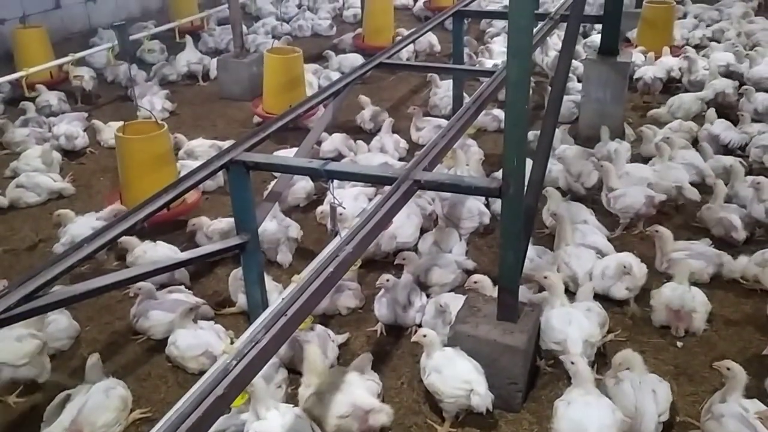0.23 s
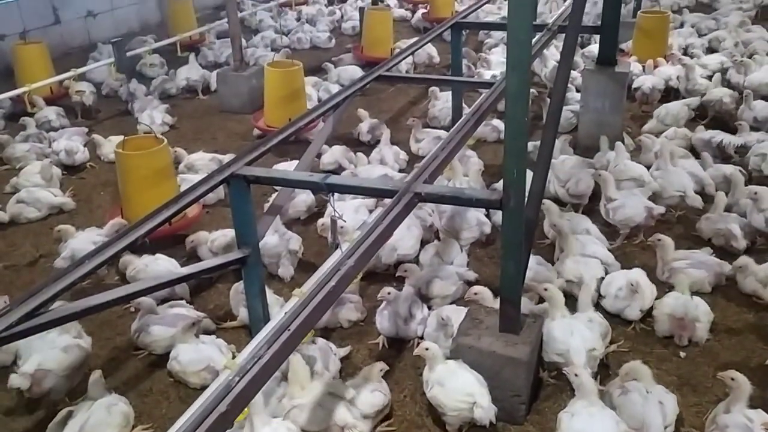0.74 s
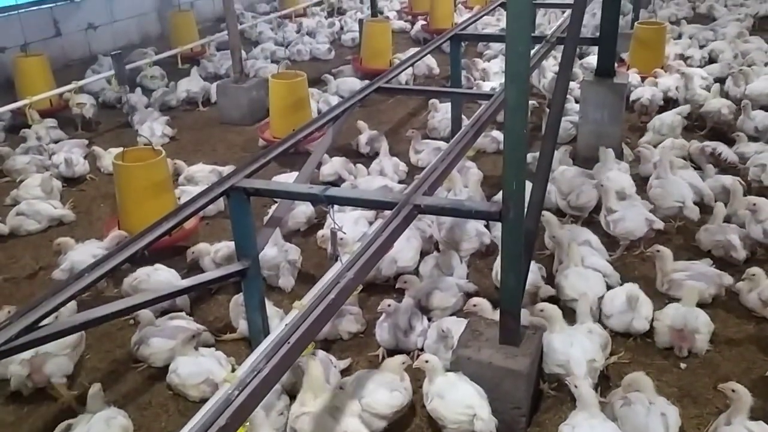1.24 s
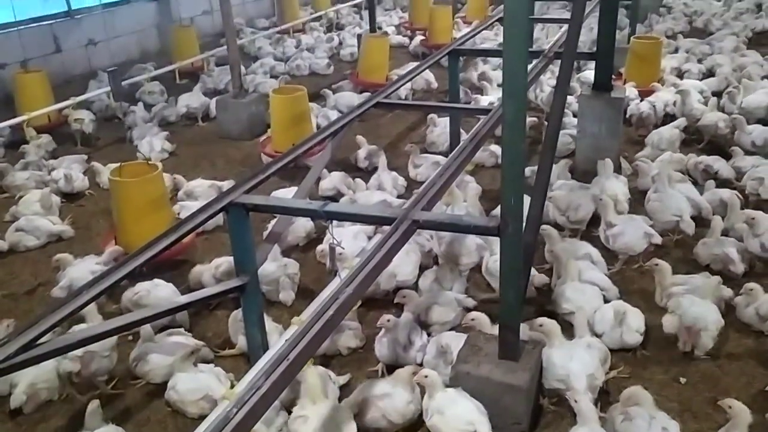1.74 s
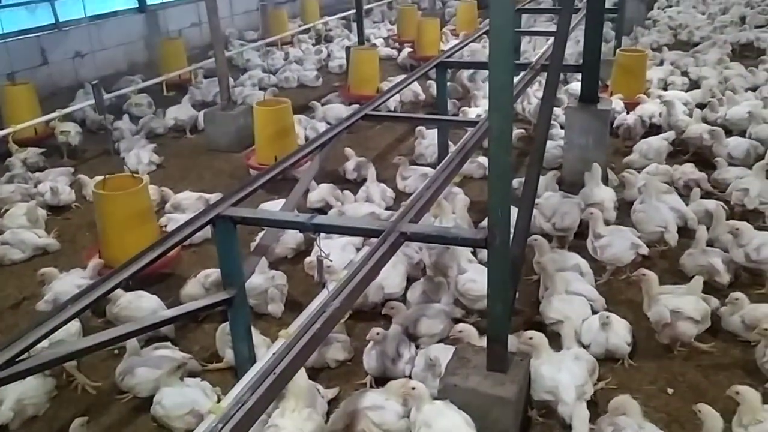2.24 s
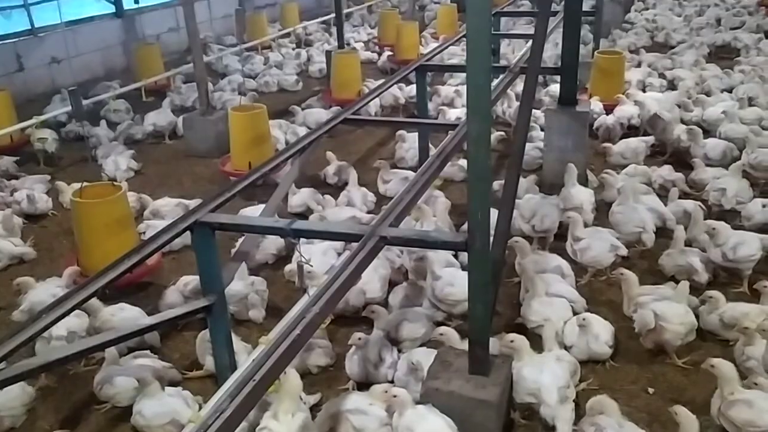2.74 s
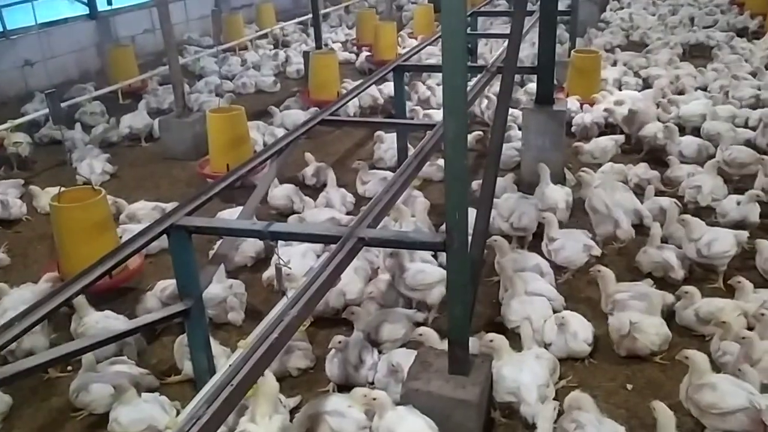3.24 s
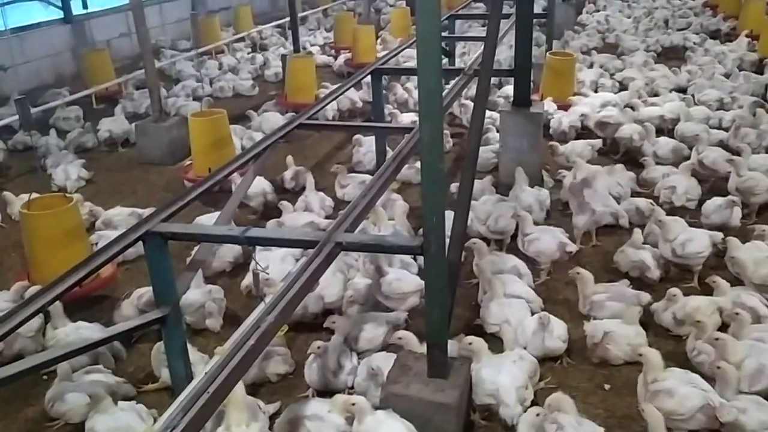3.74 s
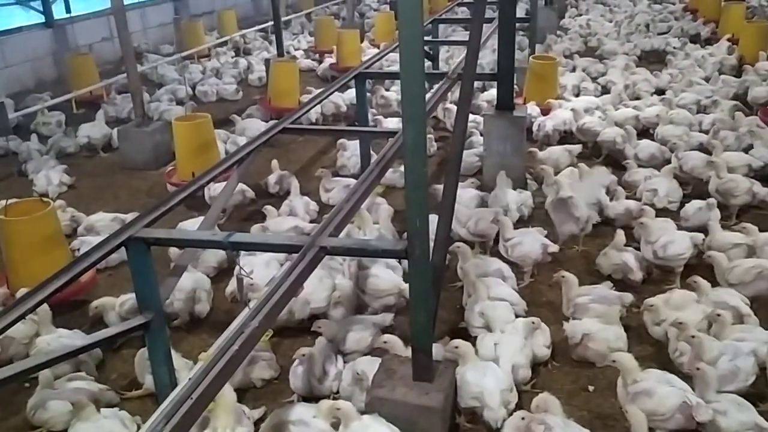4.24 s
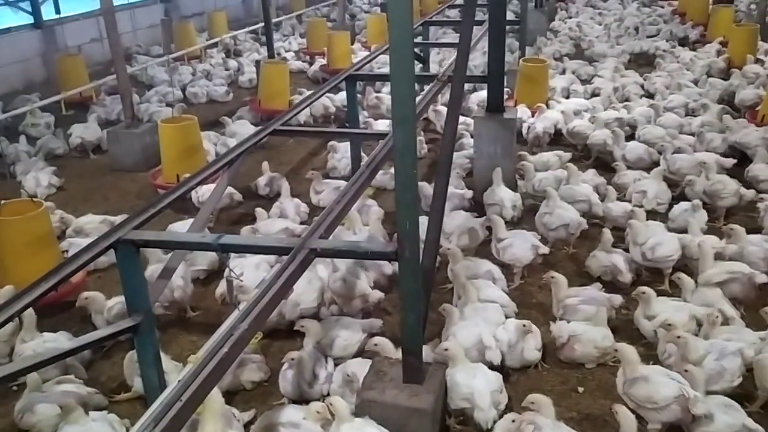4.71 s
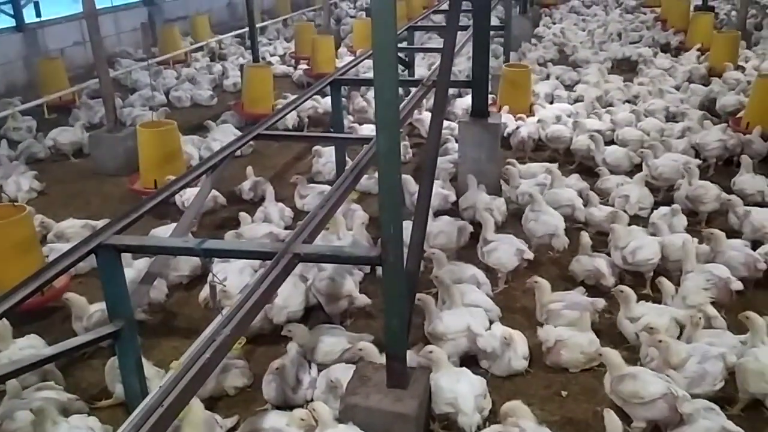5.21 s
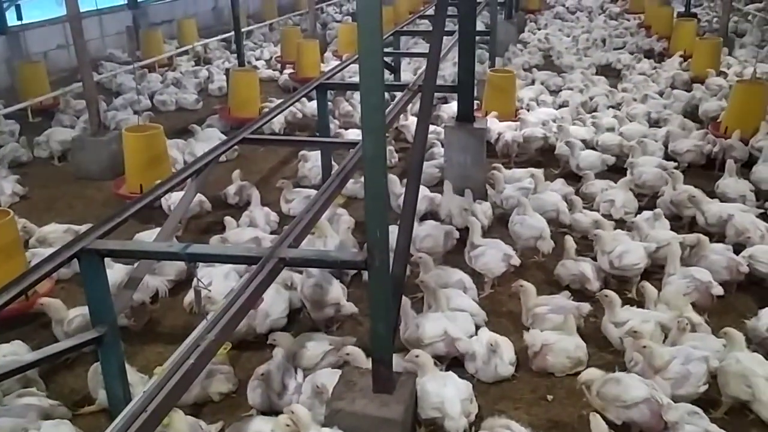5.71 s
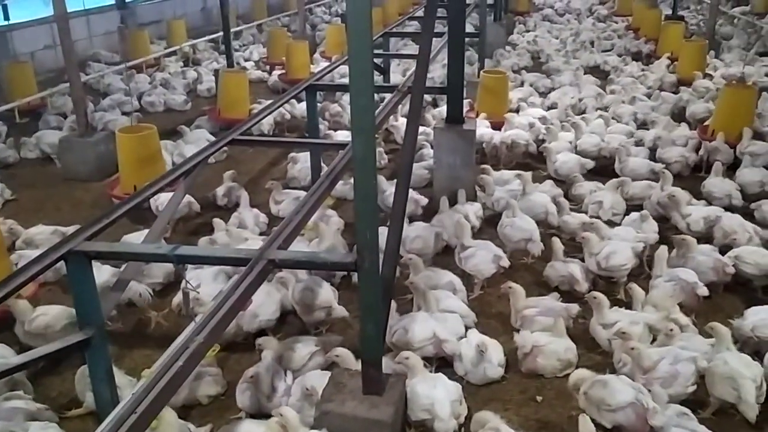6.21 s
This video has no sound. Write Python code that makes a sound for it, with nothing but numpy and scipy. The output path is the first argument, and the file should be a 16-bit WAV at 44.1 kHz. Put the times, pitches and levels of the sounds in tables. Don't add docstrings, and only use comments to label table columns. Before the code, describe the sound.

For about six and a half seconds, a closed barn full of young chickens sounds busy and even. A deep fan drone near 86 Hz swells and beats irregularly, with soft moving air beneath a blurred wash of distant chirps. From 0 s, nearby birds scatter very short falling peeps, clear little whistles and hoarse rasps, most of the rasps before 1.6 s. Faint pulsed clucks come around 0.2, 1.6, 2.4 and 4.1 s. Dry litter rustles constantly; bright claw scratches cluster around 1.2 s and recur, with dull beak knocks near 2.2, 2.6 and 4.1 s. Soft low foot thumps stand out around 0.8 and 5 s. The crowd dips briefly near 2.5 s. At 5.7 s one bird gives a thin, high squeal, about an eighth of a second long, then peeping continues to the end. The phone's stereo sound is close, with patchy treble.

```python
import sys
import numpy as np
from scipy import signal
from scipy.fft import rfft, irfft
from scipy.io import wavfile
from scipy.ndimage import uniform_filter1d

SR = 44100
rng = np.random.default_rng(int(sys.argv[2]) if len(sys.argv) > 2 else 0)


def waveform_to_disk(signal):
    frames = np.transpose(np.atleast_2d(signal))
    scaled = np.clip(frames, -1, 1) * 32767
    samples = np.round(scaled).astype(np.int16)
    wavfile.write(sys.argv[1], SR, samples)


def elevation(decibels):
    levels = np.asarray(decibels, float)
    return 10 ** (levels / 20)


N = 284886

PORT_LAG_S = 0.00033
BURST = 6000


def unit(x):
    return x / np.sqrt(np.mean(x ** 2))


def colour(x, points):
    hz, db = np.transpose(points)
    bins = np.arange(x.shape[-1] // 2 + 1) * SR / x.shape[-1] + 1
    return irfft(rfft(x) * elevation(np.interp(np.log(bins), np.log(hz), db)), x.shape[-1])


def walk(rate, size=N):
    k = max(int(SR / rate), 2)
    smooth = uniform_filter1d(rng.standard_normal(size), k, mode="wrap")
    return unit(uniform_filter1d(smooth, k, mode="wrap"))


def curves(table):
    s, *columns = np.transpose(table)
    return [np.interp(np.arange(N) / SR, s, c) for c in columns]


def swells(table, rest_db):
    t = np.arange(N) / SR
    power = elevation(2 * rest_db)
    for s, length, db in table:
        power = power + elevation(2 * db) * np.exp(-(4 * (t - s) / length) ** 2)
    return 10 * np.log10(power)


def add(out, sound, s, pan_db, lag_s):
    for ear, start, db in ((0, s, pan_db / 2), (1, s + lag_s, -pan_db / 2)):
        i = max(int(start * SR), 0)
        out[ear, i:i + len(sound)] += elevation(db) * sound[:max(N - i, 0)]


def echo(x, t60):
    t = np.arange(int(SR * 0.8)) / SR
    tail = rng.standard_normal((2, len(t))) * np.exp(-np.log(1000) * t / t60) * (t > 0.008)
    return signal.fftconvolve(x, tail / np.sqrt(np.sum(tail ** 2) / 2), axes=1)[:, :N]


def burst(db, t60, noise, rise_s, tick_db=-30):
    t = np.arange(BURST) / SR
    decay = np.exp(-np.log(1000) * t / t60) + elevation(tick_db) * np.exp(-t / 0.006)
    return elevation(db) * noise * (1 - np.exp(-t / rise_s)) * decay


def fans():
    # t/s, length/s, level/dB
    beats = [(.14, 0.65, -37.5), (.56, 0.098, -37), (.9, 0.67, -34.5), (1.36, 0.24, -35.5),
             (1.56, 0.14, -32), (1.97, 0.22, -31.5), (2.31, 0.23, -34), (2.88, 0.41, -33),
             (3.1, 0.069, -40), (3.3, 0.3, -35), (3.83, 0.48, -41), (4.37, 0.077, -35.5),
             (4.72, 0.48, -35.5), (4.92, .1, -56), (5.17, 0.42, -33.5), (5.45, 0.9, -37.5),
             (5.78, 0.39, -34), (6.44, 0.46, -40)]
    shaft_sags = (.2, 1.65, 4.15, 5.5)
    # f/Hz, level/dB
    upper_tones = [(112, 2), (130, -3.5)]
    # f/Hz, level per Hz/dB
    air_spectrum = [(34, -21.5), (64, -0.5), (100, -3.5), (145, -12), (250, -21.5), (340, -23), (520, -33),
                    (1500, -39), (2000, -35)]
    blade_hz, shaft_hz = 86.15, 42.5
    sag_length_s, sag_db = 0.38, -22
    t = np.arange(N) / SR
    ports = np.array([[1], [-1]])

    turn = 2 * np.pi * np.cumsum(1 + 0.0078 * walk(4.63)) / SR
    shift = 0.3 * walk(6) * ports
    blade = elevation(swells(beats, -46)) * np.sin(blade_hz * turn + shift)

    sag = sum(np.exp(-((t - s) / sag_length_s * 2) ** 2) for s in shaft_sags)
    shaft_db = -46 + 0.85 * walk(2.1) + sag_db * sag
    shaft = elevation(shaft_db) * np.sin(shaft_hz * turn + 4 * shift)

    second = np.zeros((2, N))
    for hz, db in upper_tones:
        phase = hz * turn + 0.53 * walk(7.5) + 0.49 * shift
        second += elevation(db + 2.36 * walk(6.5)) * np.sin(phase)

    mid, side = colour(rng.standard_normal((2, N)), air_spectrum + [(4000, -94)])
    side = colour(side, [(40, -29), (80, -16), (150, -19.5), (300, -13.5), (500, -8), (900, 0.5)])
    air = elevation(-39.5 + 1.27 * walk(2.6)) * (mid + side * ports) / np.std(mid)
    mix = np.sqrt(2) * (blade + shaft) + elevation(-45) * unit(second) + air
    return mix * elevation(-0.4 * ports)


def syrinx_flutter():
    return (walk(1400) + 1j * walk(1400)) / np.sqrt(2)


def note(length, start_hz, end_hz, hoarse_hz, flutter, lean=0.73):
    clear_hz, second_db = 60, -27
    u = np.linspace(0, 1, int(length * SR))
    phase = 2 * np.pi * np.cumsum(start_hz + (end_hz - start_hz) * (1.1 * u ** 0.7 - 0.12)) / SR
    rough = hoarse_hz ** 2 / (hoarse_hz ** 2 + clear_hz ** 2)
    shake = flutter[(np.arange(len(u)) * hoarse_hz / 400).astype(int)]
    swing = np.sqrt(1 - rough) + np.sqrt(rough) * shake
    swing = swing / np.sqrt(np.mean(np.abs(swing) ** 2))
    tone = np.imag(swing * np.exp(1j * phase)) + elevation(second_db) * np.sin(2 * phase)
    return np.sqrt(2) * np.sin(np.pi * u ** lean) * tone


def far_crowd():
    # f/Hz, level/dB
    crowd = [(700, -11.5), (1200, -15.5), (1600, -10), (2000, -3.5), (2600, -5), (3200, -10.5),
             (4000, -10.5), (5000, -30)]
    flutter = syrinx_flutter()
    far = np.zeros((2, N))
    for when, a, b, c, d, e in rng.random((1700, 6)):
        octaves = (1.7 if a + d < 1 else 0.8) * (a + d - 1)
        hz = 2400 * 2 ** octaves
        end_hz = hz * (0.97 - 0.3 * c)
        sound = note(0.015 + 0.03 * b, hz, end_hz, 18 + 70 * b * d, flutter[int(a * N / 2):])
        db = min(-3 * np.log(e), 2.2)
        add(far, elevation(db) * sound, when * N / SR - 0.02, 8 * (c - 0.45), PORT_LAG_S * 1.6 * b)
    far = unit(far) + elevation(-7) * unit(echo(far, 0.42))
    far = colour(far, np.multiply(crowd, (1, 0.4)))
    wash = rng.standard_normal((2, N)) * elevation(3.2 * walk(11))
    return unit(unit(far) + elevation(-5.5) * unit(colour(wash, crowd)))


def litter_bed(rustle_db):
    # f/Hz, level per Hz/dB
    rustle = [(1760, -7), (3000, 5.5), (3650, -0.5), (4290, -2), (7720, -3), (11500, -6.5), (15760, -10),
              (16000, -64)]
    left_db = 3.5
    grain_db = np.minimum(4.4 * rng.exponential(size=(2, N)), 13)
    grains = (rng.random((2, N)) < 500 / SR) * elevation(grain_db)
    grains = signal.lfilter([1], [1, -0.99], grains) * rng.standard_normal((2, N))
    bed = elevation(-1.5) * unit(grains)
    shuffle = 1.68 * walk(40)
    for hz in (5000, 9000, 14000):
        part = colour(rng.standard_normal((2, N)), [(hz / 6.3, -30), (hz, 0), (hz * 130, -30)])
        flicker_db = shuffle + np.array([2 * walk(18), 2 * walk(2.4)])
        bed = bed + unit(part) * np.sqrt(hz / 14000) * elevation(flicker_db)
    pan = np.array([[left_db], [-left_db]]) / 2
    return unit(colour(bed, [(1500, -35)] + rustle)) * elevation(rustle_db + pan + 1)


def thumps():
    # t/s, peak level/dB, f/Hz
    blows = [(.02, -42, 341), (0.189, -42, 388), (0.442, -40, 217), (0.662, -38.5, 332),
             (0.836, -32.5, 216), (1.54, -48, 403), (2.311, -40, 207), (2.656, -39.5, 321),
             (2.713, -41, 372), (4.101, -40, 290.6), (4.312, -45, 308), (4.402, -42, 270),
             (5.05, -44.5, 394), (5.151, -35.5, 205), (4.969, -36, 171), (4.791, -50, 283),
             (4.909, -47, 292), (4.872, -41, 201), (5.309, -46, 330), (6.131, -45, 364)]
    out, t = np.zeros((2, N)), np.arange(BURST) / SR
    for s, db, hz in blows:
        ring = np.sin(2 * np.pi * hz * t) + 0.5 * np.sin(2 * np.pi * 1.37 * hz * t)
        add(out, burst(db, 0.11, ring, 0.0025), s, 0, 0)
    return out


def knocks():
    # t/s, peak level/dB, centre f/Hz, t60/s
    pecks = [(0.185, -36, 1790, 0.085), (0.559, -36.5, 1790, 0.082), (2.183, -31, 3300, 0.082),
             (2.422, -34, 1690, .03), (2.4265, -44, 1780, .04), (2.648, -32.5, 1470, 0.035),
             (4.782, -38, 1900, 0.022), (4.088, -33.5, 2070, 0.086), (4.415, -37, 2350, 0.073),
             (4.46, -34, 1560, 0.028), (4.949, -36.5, 2000, 0.026), (5.054, -37.5, 1120, 0.038),
             (5.53, -39.5, 2020, 0.086), (6.127, -36, 690, 0.037), (.875, -40, 1000, .04),
             (1.57, -40, 1100, .04), (3.027, -45, 1000, .04), (4.225, -44, 1100, .04)]
    out = np.zeros((2, N))
    for s, db, hz, t60 in pecks:
        body = [(hz / 7, -30), (hz / 1.94, -5), (hz, 0), (2 * hz, -5), (4 * hz, -24)]
        noise = unit(colour(rng.standard_normal(BURST), body))
        add(out, burst(db - 7.5, min(t60, 0.075), noise, 0.0007, 3), s, 1.5, 0.4 * PORT_LAG_S)
    return out + elevation(-14) * echo(out, 0.2)


def scratches():
    # t/s, peak level/dB, left minus right level/dB
    claws = [(0.175, -37, -6), (0.2135, -30.5, 6), (0.3782, -31.5, -2), (0.563, -26.5, -7),
             (1.021, -35.5, 8), (1.112, -35.5, -2), (1.2356, -32, 2), (1.247, -30, 0), (1.269, -25, 3),
             (1.345, -33.5, -2), (1.467, -41, 2.5), (1.539, -35, 0), (1.62, -34, 6), (1.6853, -39.5, 7),
             (1.841, -33, 1), (1.945, -31.5, 4), (2.1809, -47, -3), (2.285, -33.5, 4), (2.5676, -40, 1),
             (2.579, -38, 1), (2.74, -37.5, 4), (2.931, -38, 9), (2.9482, -39, 5), (3.157, -39.5, 11),
             (3.332, -31, 1), (3.7646, -33.5, 3), (4.126, -35, 4), (4.157, -32.5, 3), (4.1868, -31, 0),
             (4.471, -28, 2), (4.773, -39, -4), (4.865, -36, 2), (4.879, -30.5, 3), (5.8016, -29, -1),
             (5.9975, -36, -3), (.5202, -42, -6), (0.876, -40, -6), (1.4346, -46, 3), (1.729, -38, 0),
             (2.433, -39, 3), (2.769, -36, 3), (2.8564, -40.5, 0), (3.276, -42, 0), (3.4385, -40.5, 10),
             (3.472, -45, 5), (3.493, -43, 4), (3.7908, -31, 2), (3.8487, -56, 0), (4.2727, -45, -1),
             (4.6892, -58, -2), (4.7371, -47, -7), (5.07, -37, 5), (5.1786, -45, 0), (5.468, -40, 4),
             (5.5174, -45, -8), (5.737, -45, -3), (6.3668, -47, -3), (6.4288, -47, -3)]
    out = np.zeros((2, N))
    for s, db, pan_db in claws:
        noise = rng.standard_normal((2, BURST))
        hz = 7500 * 2 ** (0.36 * noise[0, 0])
        t60 = 0.1 * 2 ** (0.3 * noise[1, 0])
        crackle = unit(colour(noise, [(2500, -25), (hz * 0.76, -3), (hz, 0), (16000, -7)]))
        port_db = db - 10 + np.array([[pan_db], [-pan_db]]) / 2
        i = int(s * SR)
        out[:, i:i + BURST] += burst(port_db, t60, crackle, 0.0018, -1)[:, :N - i]
    return out


def clucks():
    # t/s, length/s, pulse rate f/Hz, throat f/Hz, level/dB
    pulsed = [
        (.185, 0.047, 300, 1920, -44),
        (1.555, 0.039, 300, 1900, -45),
        (2.41, 0.029, 320, 1700, -40.5),
        (4.1, 0.021, 480, 1670, -44),
    ]
    out = np.zeros((2, N))
    for s, length, rate_hz, hz, db in pulsed:
        jitter, shimmer = rng.standard_normal((2, 30))
        times = (np.cumsum(1 + 0.067 * jitter) / rate_hz * SR).astype(int)
        pulses = np.zeros(8192)
        arch = np.sin(np.pi * np.minimum(times / SR / length, 1)) ** 0.6
        pulses[times] = elevation(1.5 * shimmer) * arch
        throat = [(hz / 2.8, -30), (hz / 1.8, -6), (hz / 1.4, -9), (hz, 0), (hz * 1.4, -6), (hz * 1.9, -26)]
        sound = colour(pulses, throat)
        add(out, elevation(db) * sound / np.std(sound[:int(length * SR)]), s, 0.6, 0.3 * PORT_LAG_S)
    return out + elevation(-8) * echo(out, 0.12)


def call(out, flutter, s, length, start_hz, end_hz, db, hoarse_hz, lagged=True):
    a, b, c = rng.random(3)
    pad = 0.006
    sound = note(length + 2 * pad, start_hz, end_hz, hoarse_hz, flutter[int(a * N / 2):])
    add(out, elevation(db) * sound, s - pad, 1.4 + 4 * (b - 0.5), PORT_LAG_S * (0.05 + 0.8 * c) * lagged)


def squeal(out, flutter):
    # t/s, length/s, start f/Hz, end f/Hz
    s, length, start_hz, end_hz = (5.712, 0.125, 1935, 1915)
    overtones = [(2, -44.5), (3, -61), (4, -48), (5, -66)]
    for k, db in overtones:
        tone = note(length, k * start_hz, k * end_hz, 24 * k, flutter[1000 * int(k):], lean=0.52)
        add(out, elevation(db) * tone, s, 1.5, PORT_LAG_S)


def rasps(out, flutter):
    # t/s, length/s, start f/Hz, end f/Hz, level/dB
    hoarse = [(0.177, 0.02, 1820, 1870, -44), (0.187, 0.042, 4400, 3615, -47.5),
              (0.735, 0.06, 2960, 2770, -47), (0.876, 0.014, 833, 1000, -57),
              (0.9, 0.051, 2190, 2120, -42.5), (1.19, 0.032, 2430, 2260, -49),
              (1.228, 0.07, 2150, 2020, -46), (1.534, 0.0344, 2760, 3080, -47),
              (1.548, 0.048, 1330, 1276, -53), (4.22, 0.025, 1155, 1154, -50),
              (4.449, 0.017, 2240, 1870, -45)]
    for s, length, start_hz, end_hz, db in hoarse:
        call(out, flutter, s, length, start_hz, end_hz, db, 125)


def whistles(out, flutter):
    # t/s, length/s, start f/Hz, end f/Hz, level/dB
    clear = [(0.207, .05, 2450, 2230, -51), (0.778, 0.028, 1980, 1780, -42.5),
             (0.952, 0.038, 1900, 1650, -46), (1.22, .02, 1790, 1760, -43.5), (2.1, 0.04, 1800, 2800, -49),
             (2.382, 0.027, 1900, 1810, -48), (3.071, 0.022, 1750, 1330, -49.5),
             (3.426, 0.043, 1910, 1740, -48), (3.643, .045, 1000, 890, -54),
             (3.926, 0.029, 1930, 1874, -52), (4.612, 0.022, 1140, 1090, -50.5),
             (4.785, 0.021, 1410, 1120, -42), (6.2, 0.05, 2150, 2030, -51.5),
             (4.9, 0.039, 1710, 1610, -52.5), (5.73, .04, 7850, 7820, -48), (5.758, 0.037, 1964, 1920, -47),
             (5.903, 0.039, 2125, 1930, -47), (7, .025, 1400, 2400, -53), (6.221, 0.011, 2220, 1900, -47),
             (6.4, .018, 3420, 3265, -57.5)]
    for s, length, start_hz, end_hz, db in clear:
        call(out, flutter, s, length, start_hz, end_hz, db, 22, lagged=False)


def peeps(out, flutter):
    # t/s, length/s, start f/Hz, level/dB
    steep = [(0.628, 0.026, 1780, -48), (1.327, 0.019, 2180, -42.5), (2.288, 0.054, 2690, -47.5),
             (3.329, 0.034, 2125, -44), (3.622, 0.03, 2070, -51), (3.644, 0.046, 2110, -42),
             (3.83, 0.023, 2660, -50), (4.225, 0.027, 2510, -42), (5.355, 0.075, 1690, -53),
             (5.585, 0.019, 2136, -49.5), (5.7, 0.053, 2910, -47)]
    soft = [(0.04, 0.02, 2350, -48), (0.913, 0.015, 1546, -49.5), (1.202, 0.018, 2230, -37),
            (1.701, 0.037, 2370, -48), (2.307, 0.021, 1820, -53), (2.456, 0.037, 1990, -44),
            (2.862, 0.04, 1960, -46.5), (3.131, 0.016, 1525, -49), (3.211, 0.058, 1230, -54),
            (3.901, 0.035, 1000, -52), (3.94, 0.019, 2785, -41), (4.833, 0.011, 1370, -53),
            (5.042, 0.038, 2190, -46.5), (5.098, 0.039, 1950, -43.5), (5.161, 0.033, 2840, -54),
            (5.884, 0.023, 1010, -50), (5.991, 0.017, 2930, -49), (5.994, 0.031, 1850, -50),
            (6.282, 0.019, 2310, -45.5), (6.418, 0.026, 2135, -42)]
    even = [(0.028, 0.017, 1780, -40.5), (0.597, 0.044, 2350, -46), (0.753, 0.03, 1614, -49.5),
            (0.788, 0.021, 1370, -52), (1.25, 0.023, 1820, -40), (1.471, 0.039, 1720, -48.5),
            (2.104, 0.016, 3000, -49), (2.847, 0.0056, 1330, -56), (3.313, 0.017, 1330, -53),
            (3.835, 0.013, 2780, -56), (4.243, 0.039, 1930, -49), (5.121, 0.015, 960, -53),
            (4.763, 0.015, 1160, -53), (.1, 0.014, 964, -55), (1.26, 0.016, 938, -54),
            (2.415, 0.026, 962, -47), (2.885, 0.026, 970, -55), (3.535, 0.027, 1200, -54),
            (4.455, 0.015, 1010, -56), (5.4, 0.025, 980, -56), (5.61, 0.033, 993, -58),
            (6.41, .03, 1097, -56), (4.495, .015, 2190, -48)]
    # t/s, length/s, start f/Hz, end f/Hz, level/dB
    glides = [(0.061, 0.049, 1620, 1405, -49), (.1, 0.043, 1890, 1730, -50),
              (0.138, 0.039, 1600, 1256, -48), (0.3, 0.036, 2380, 2100, -53),
              (0.317, 0.061, 2050, 1990, -55), (0.36, 0.022, 3470, 3120, -57),
              (0.434, 0.025, 2730, 2580, -59), (0.516, 0.063, 1600, 1475, -50),
              (0.757, 0.027, 2450, 2040, -44), (1.021, 0.016, 1450, 1210, -52),
              (1.087, 0.031, 2960, 2760, -49), (1.173, 0.029, 3680, 3585, -53),
              (1.375, 0.041, 2400, 1960, -47.5), (1.48, 0.023, 2300, 2310, -54),
              (1.752, 0.039, 2850, 2790, -51.5), (1.953, 0.013, 2320, 1900, -53),
              (1.994, 0.04, 3350, 2360, -46.5), (2.043, 0.043, 3470, 2550, -59.5),
              (2.089, 0.039, 2750, 2204, -48), (2.115, 0.0068, 2230, 1880, -64),
              (2.704, 0.027, 2114, 1830, -50), (2.865, 0.028, 3850, 3400, -59),
              (2.91, .012, 3300, 3120, -49), (2.999, 0.018, 2114, 2076, -54),
              (3.029, 0.051, 3320, 2550, -44.5), (3.175, 0.031, 4050, 3680, -55),
              (4.317, 0.026, 2470, 1740, -42.5), (4.434, 0.014, 1770, 2320, -51),
              (4.55, 0.02, 1830, 1740, -48), (4.568, 0.0076, 1700, 1140, -45.5),
              (4.613, 0.0087, 1790, 1080, -48), (4.65, .03, 2680, 2550, -50),
              (4.748, 0.027, 2630, 2300, -48), (4.784, 0.003, 2420, 1340, -40.5),
              (5.161, 0.022, 2510, 2220, -42), (5.196, 0.049, 2600, 2380, -52),
              (5.293, 0.084, 2200, 1944, -43.5), (5.558, 0.038, 3080, 2060, -46),
              (5.926, 0.026, 2590, 2460, -51.5)]
    for kind, fall, fall_per_s in ((steep, 0.13, 0.81), (soft, 0.088, 0), (even, 0.014, 0)):
        for s, length, hz, db in kind:
            call(out, flutter, s, length, hz, hz * (1 - fall - fall_per_s * length), db, 43)
    for s, length, start_hz, end_hz, db in glides:
        call(out, flutter, s, length, start_hz, end_hz, db, 32)


def near_birds():
    flutter = syrinx_flutter()
    near = np.zeros((2, N))
    for voice in (squeal, rasps, whistles, peeps):
        voice(near, flutter)
    return near + elevation(-4.5) * echo(near, 0.14)


def scene():
    # t/s, calling of the far crowd level/dB, shuffling feet level/dB
    flock = [(0, -52.5, -52), (.6, -49.5, -49.5), (1.06, -53.5, -54), (1.24, -51, -51), (2.14, -52, -51),
             (2.44, -51.5, -53.5), (2.54, -57.5, -55.5), (2.9, -51.5, -53.5), (3.72, -51.5, -54),
             (3.8, -49.5, -49), (4.18, -55.5, -50.5), (4.28, -52, -50.5), (4.86, -54, -51.5),
             (5.36, -50.5, -53.5), (5.46, -52, -55), (5.76, -50, -52), (6.3, -54, -54),
             (6.46, -53.5, -53.5)]
    # t/s, length/s, level/dB
    scuffles = [(.4, 0.21, -51), (1.06, 0.12, -51.5), (1.25, 0.2, -56), (2.26, 0.2, -49), (2.6, 0.1, -50),
                (2.98, 0.19, -51), (3.34, 0.15, -55), (3.81, 0.04, -59), (4.34, 0.059, -48),
                (4.78, 0.082, -49), (4.9, 0.054, -49), (5.21, 0.11, -46.5), (5.76, 0.13, -46)]
    crowd_db, rustle_db = curves(flock)
    background = fans() + far_crowd() * elevation(crowd_db + 3)
    floor = litter_bed(swells(scuffles, rustle_db)) + thumps() + knocks() + scratches()
    return background + floor + clucks() + near_birds()


def gate(x):
    drop_db, patchy_db = -4.6, 2.7
    turn = np.array([[1, 0.87], [1, -0.96]]) / np.sqrt(2)
    hz, _, z = signal.stft(turn @ x, SR, nperseg=2048)
    bins, frames = len(hz), z.shape[2]
    treble = np.clip(hz / 1600 - 1, 0, 1)[:, None]
    field = rng.standard_normal((2, 171, frames // 2 + 1)).repeat(6, 1).repeat(2, 2)
    z = z * elevation(patchy_db * field[:, :bins, :frames] * treble)
    power = np.abs(z) ** 2
    band = uniform_filter1d(power, size=6, axis=1)[:, 3::6].repeat(6, 1)[:, :bins]
    tilt_db = np.interp(hz, (4500, 5500, 8000, 10000), (0, -4, -3, 5))[:, None]
    masker = uniform_filter1d(power, size=70, axis=1) * treble ** 4 * elevation(tilt_db)
    keep = np.clip((10 * np.log10(band / (masker + 1e-30)) - drop_db) / 2, 0.03, 1)
    z = z * keep * (hz < 15830)[:, None]
    return turn @ signal.istft(z, SR, nperseg=2048)[1][:, :N]


def band_limit(x):
    return signal.sosfilt(signal.butter(12, 16440, fs=SR, output="sos"), x)


def record(dry):
    bass_cut = signal.butter(9, 36, "high", fs=SR, output="sos")
    top_cut = signal.ellip(10, 0.2, 80, 15830, fs=SR, output="sos")
    mix = signal.sosfilt(np.vstack([bass_cut, top_cut]), gate(dry))
    return band_limit(mix)


dry = scene()
out = record(dry)
waveform_to_disk(out)
```